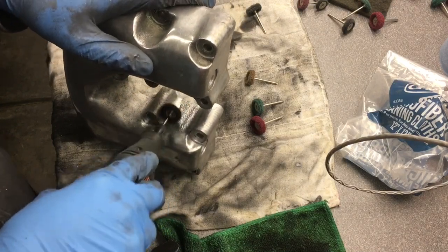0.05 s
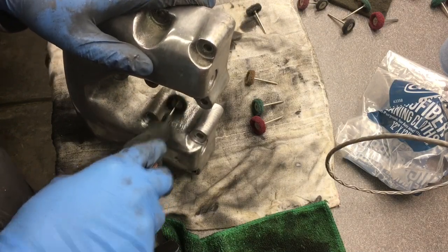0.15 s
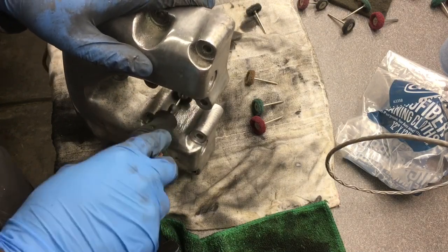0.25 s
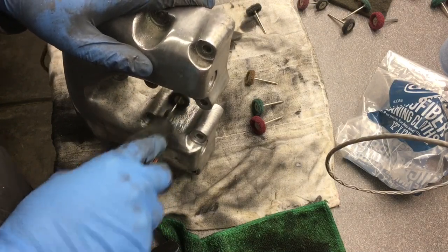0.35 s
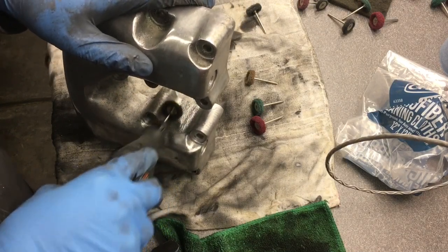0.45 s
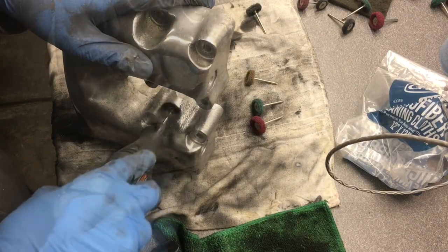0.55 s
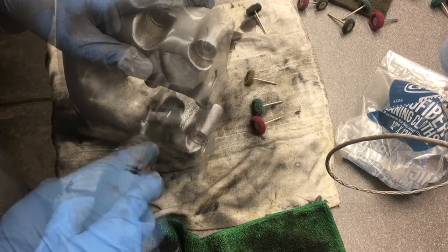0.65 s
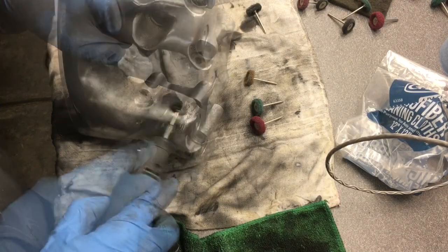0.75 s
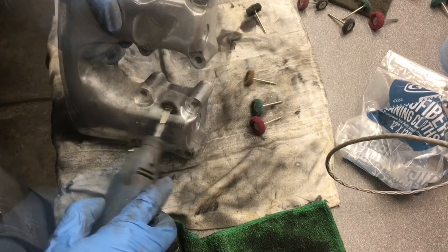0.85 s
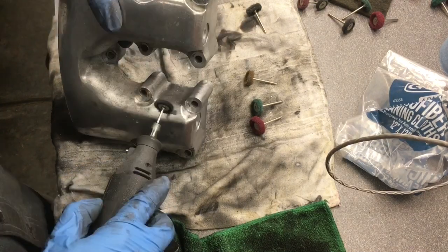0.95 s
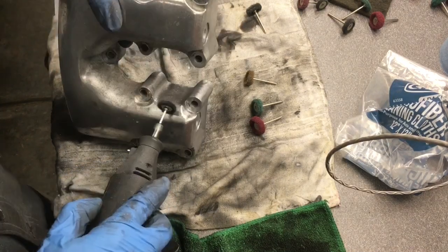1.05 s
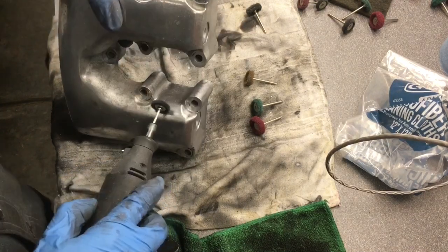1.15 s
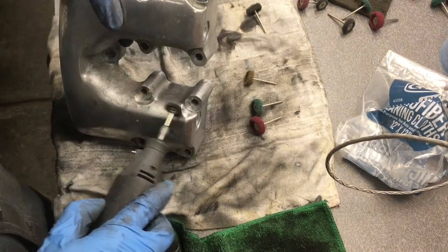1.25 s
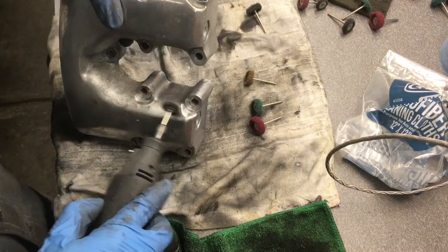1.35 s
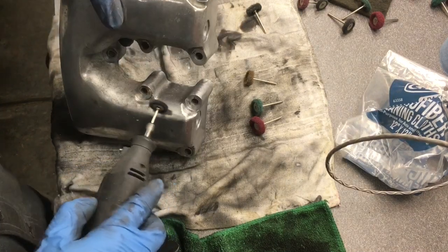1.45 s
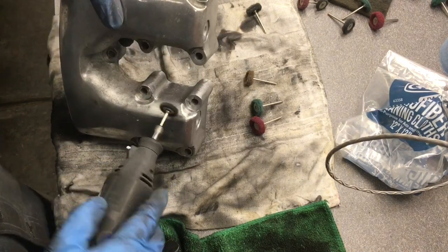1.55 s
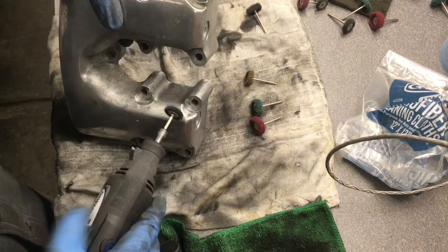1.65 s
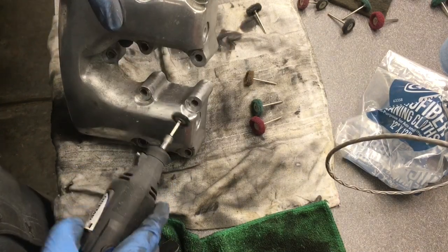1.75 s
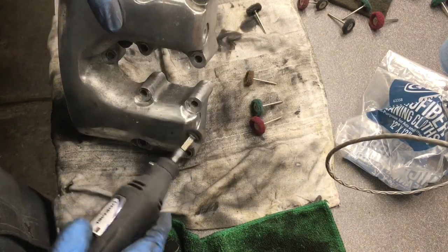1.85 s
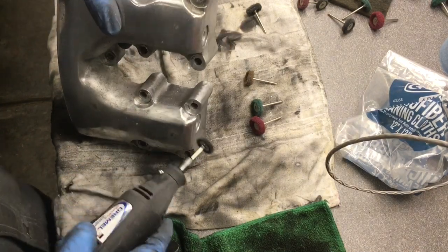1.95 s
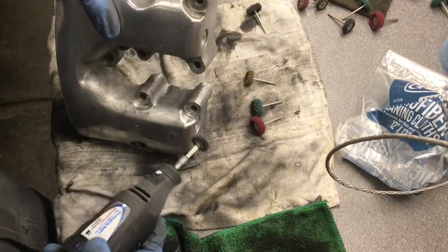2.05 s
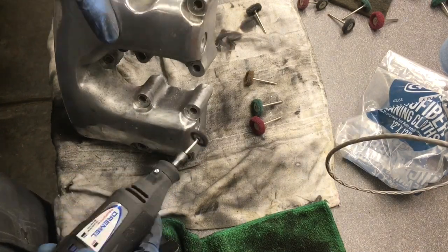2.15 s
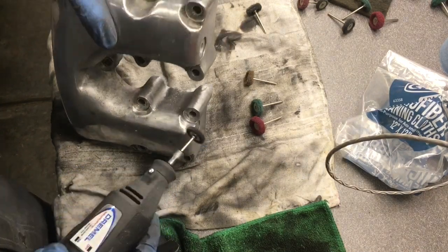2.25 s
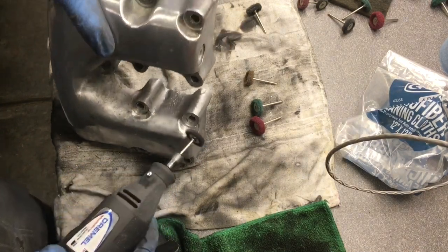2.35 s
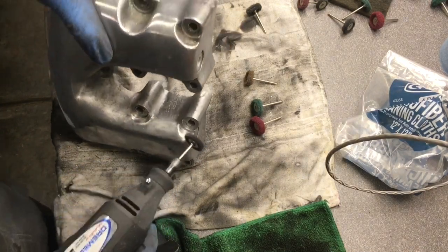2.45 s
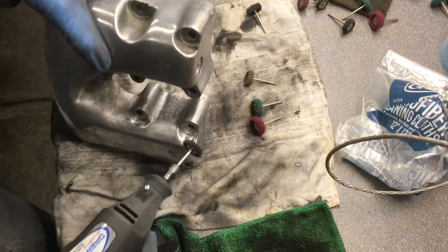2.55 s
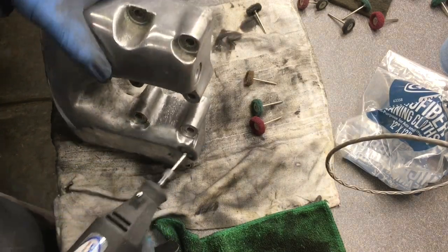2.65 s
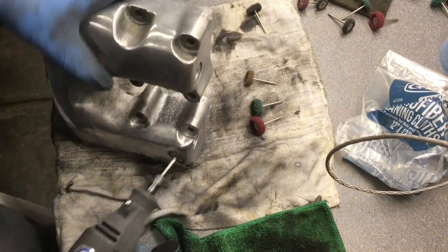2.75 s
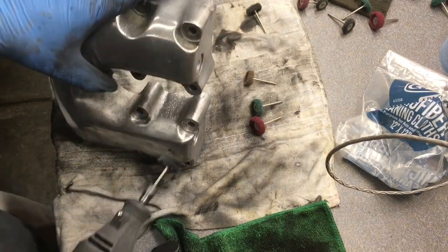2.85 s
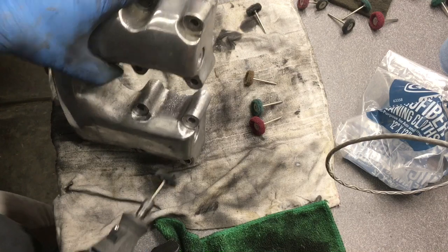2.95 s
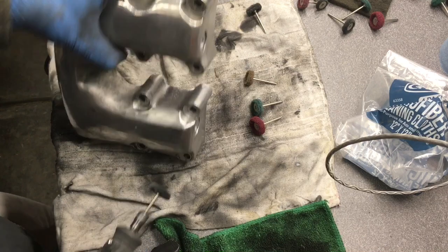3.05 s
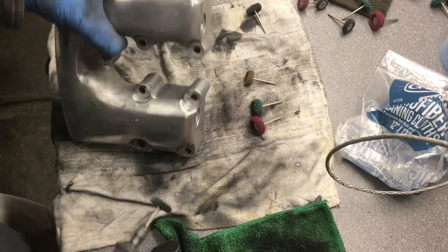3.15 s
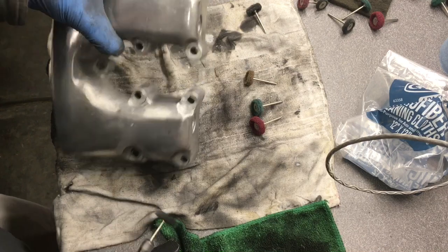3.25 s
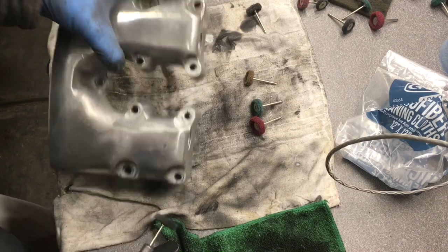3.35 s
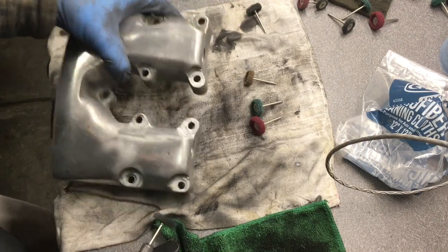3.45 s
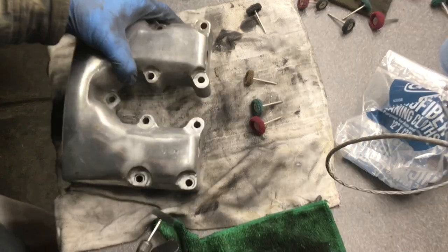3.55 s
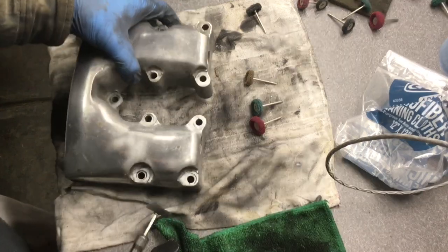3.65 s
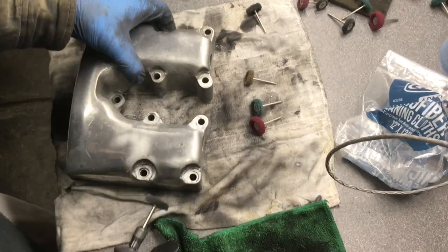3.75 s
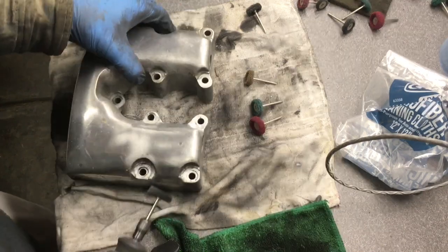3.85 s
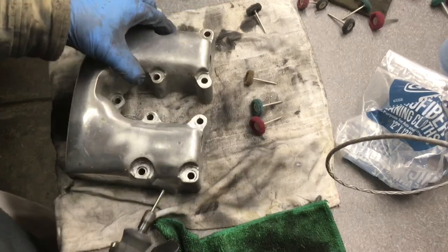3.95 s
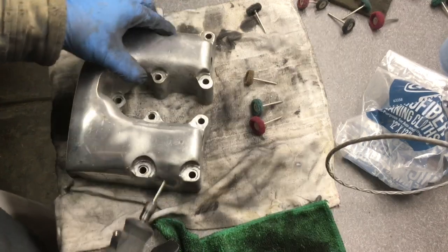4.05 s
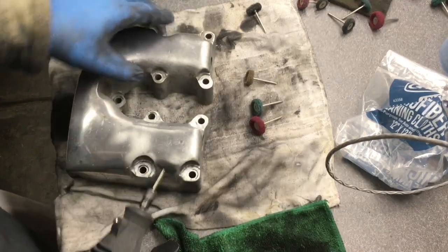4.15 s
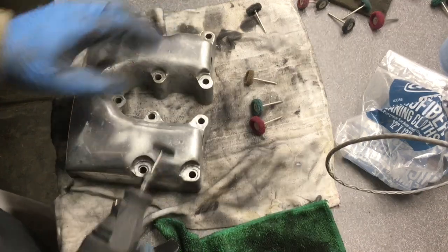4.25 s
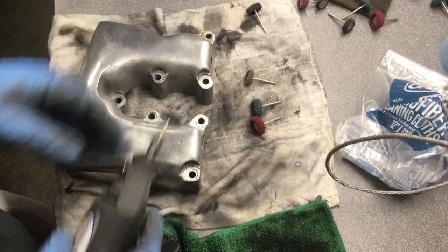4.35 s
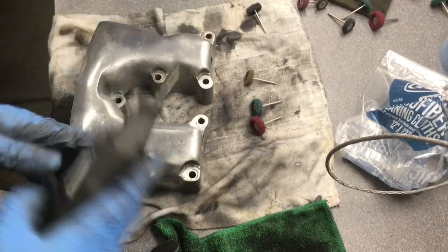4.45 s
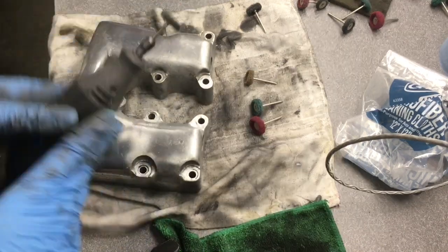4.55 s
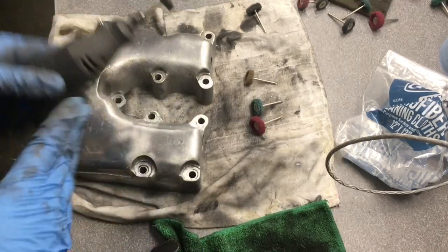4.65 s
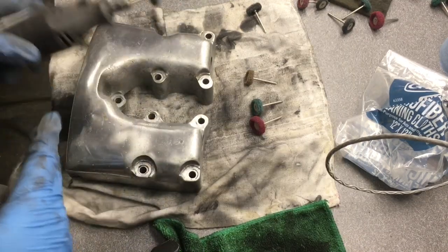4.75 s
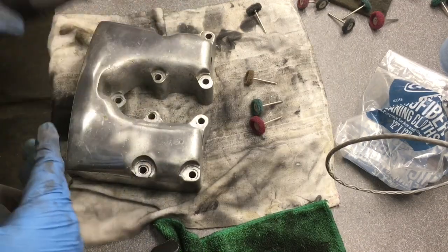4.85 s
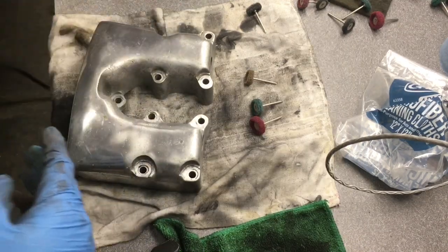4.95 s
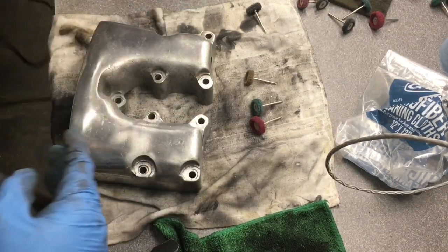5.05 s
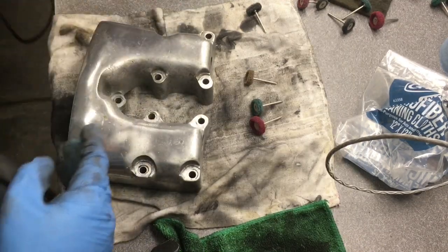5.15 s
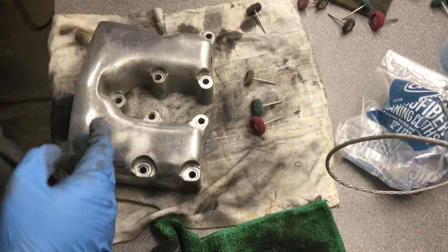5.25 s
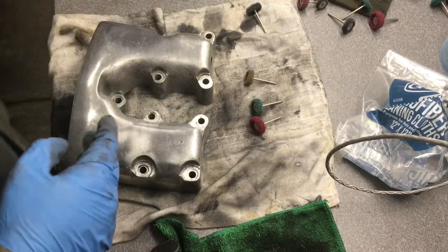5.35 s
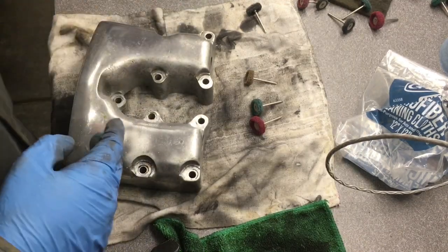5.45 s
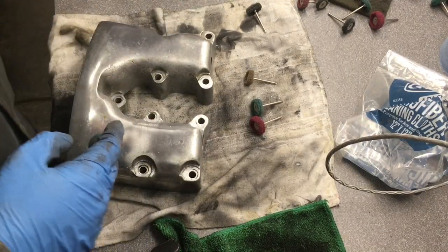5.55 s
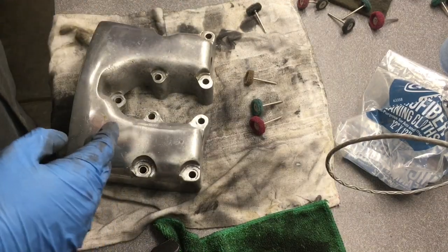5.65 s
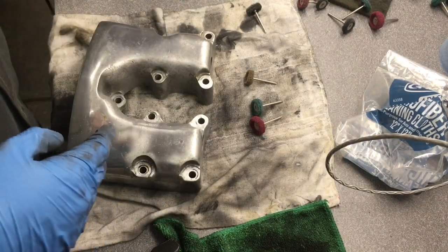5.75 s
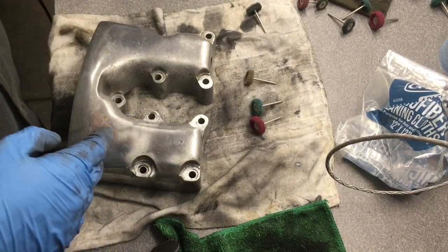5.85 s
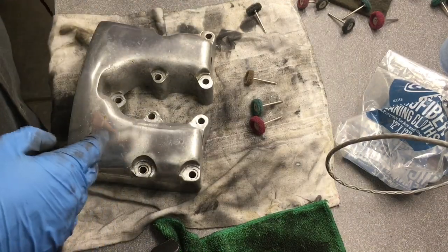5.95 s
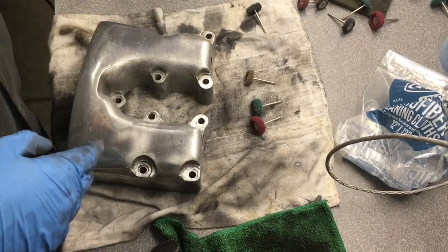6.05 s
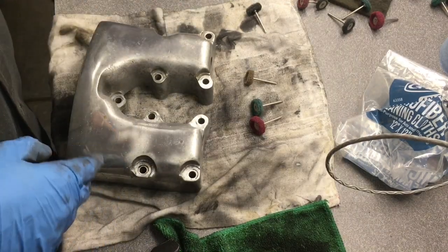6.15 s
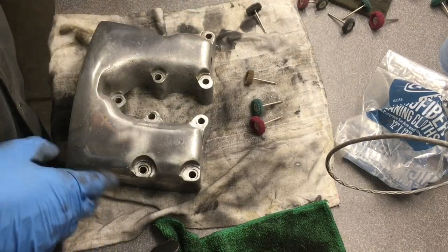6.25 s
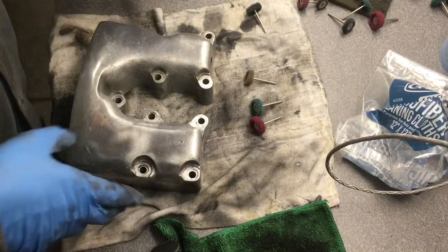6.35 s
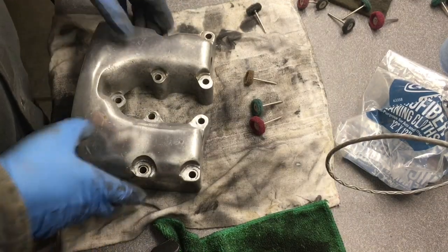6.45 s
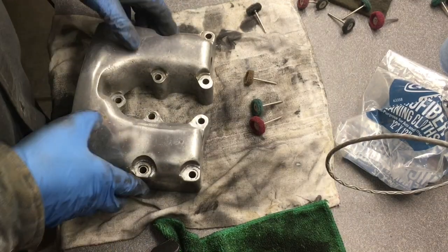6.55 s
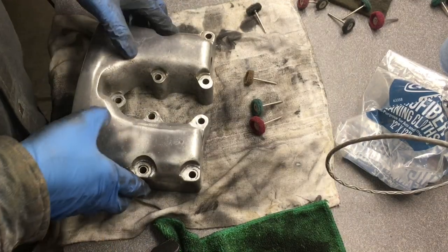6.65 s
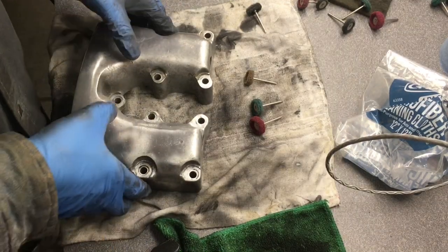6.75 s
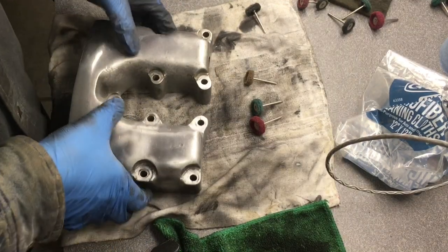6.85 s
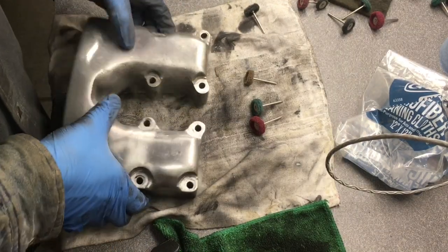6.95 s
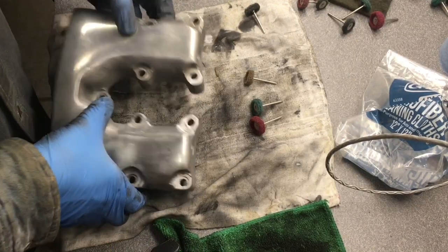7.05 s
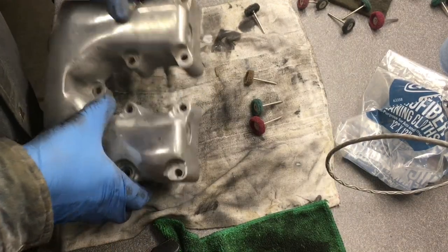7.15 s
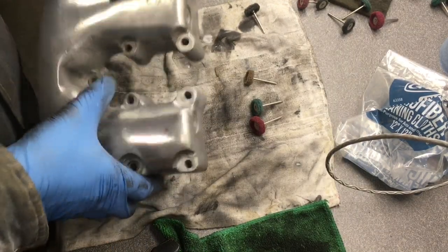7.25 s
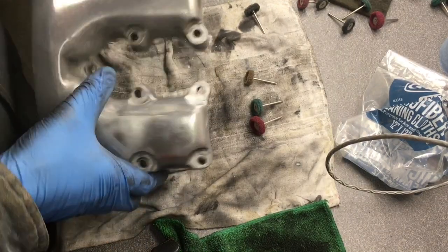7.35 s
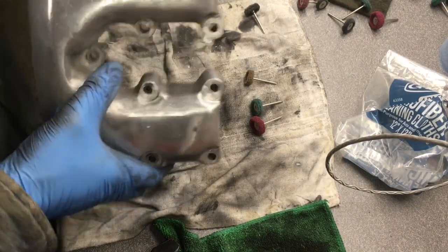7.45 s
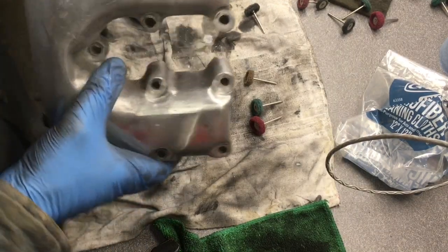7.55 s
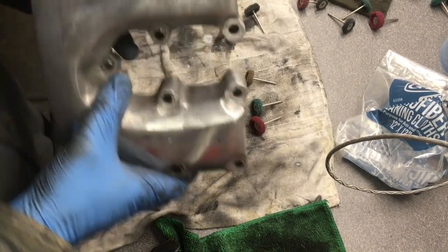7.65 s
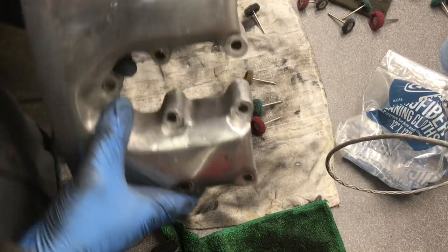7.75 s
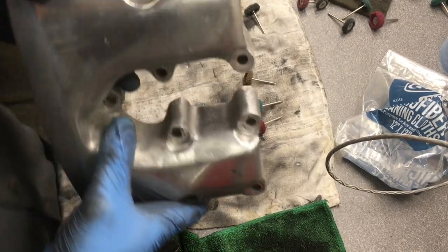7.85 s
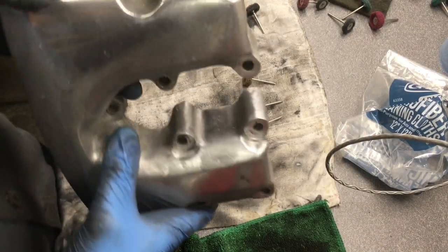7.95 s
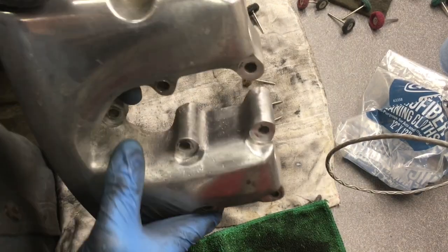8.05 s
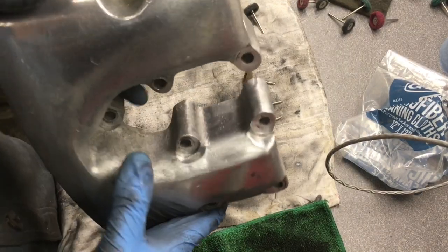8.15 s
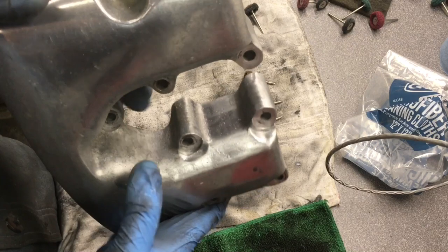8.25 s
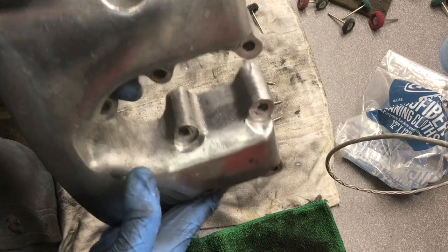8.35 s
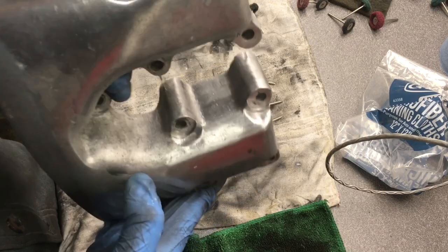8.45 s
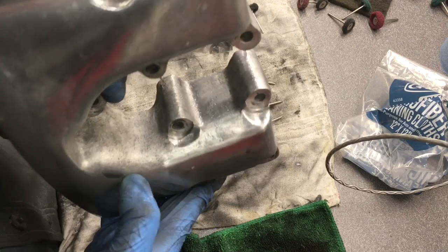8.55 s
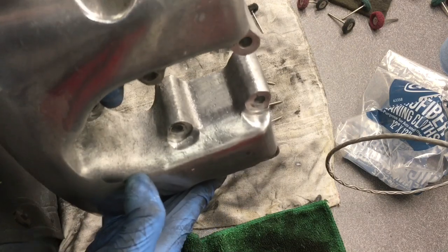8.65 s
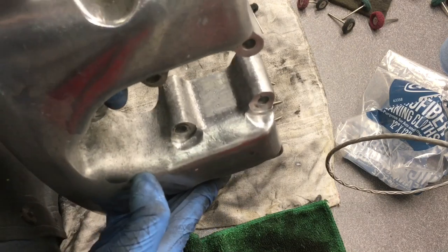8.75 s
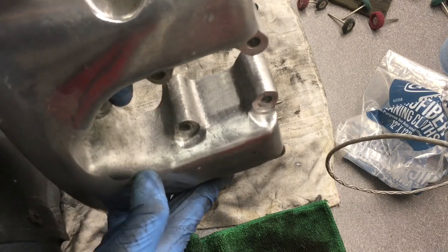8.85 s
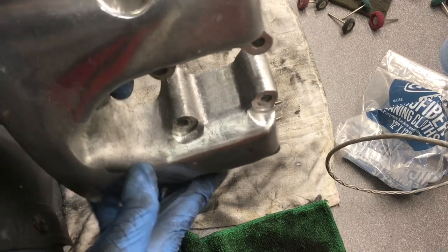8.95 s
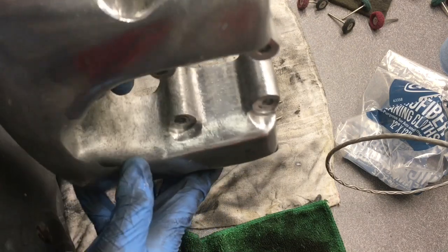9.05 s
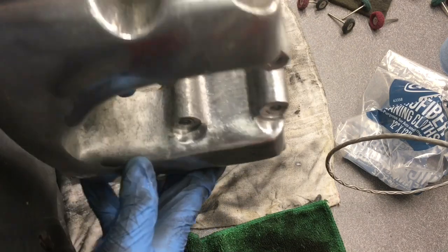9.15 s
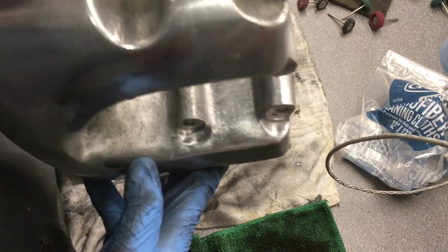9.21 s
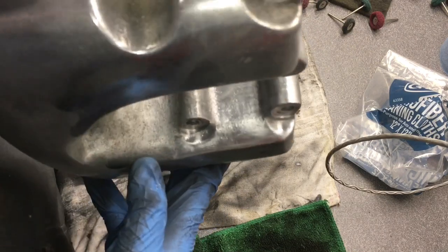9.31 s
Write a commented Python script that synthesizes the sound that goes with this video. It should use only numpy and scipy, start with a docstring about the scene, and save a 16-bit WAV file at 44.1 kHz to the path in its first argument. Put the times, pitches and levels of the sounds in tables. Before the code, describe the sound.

High-speed rotary tool hums, hisses and buzzes, coasts down in a falling whine, followed by a heavy knock, quiet ticks and soft hand rubbing.

```python
"""Rotary tool run-down, then bench handling

A small rotary tool spins a buffing wheel on a cast aluminium cover, speeds up, is switched off and coasts to rest:
tones locked to the shaft angle, plus air rush and brush hiss from shaped noise.
Thumps and ticks on a rag-covered bench ring modes; gloved hands wipe as gated noise; the lifted cover
scrapes and rings. A beating hum and rumble fill the garage. One close microphone."""
import sys
import numpy as np
from scipy import signal
from scipy.fft import rfft, irfft, next_fast_len
from scipy.io import wavfile

SR = 44100
rng = np.random.default_rng(int(sys.argv[2]) if len(sys.argv) > 2 else 0)


def dump(signal):
    """Clip the signal to [-1, 1] and save it as 16-bit WAV at the path in sys.argv[1]."""
    limited = np.clip(np.atleast_2d(signal).T, -1, 1)
    pcm = np.round(limited * 32767).astype(np.int16)
    wavfile.write(sys.argv[1], SR, pcm)


N = 413658
T = np.arange(N) / SR
CUTOFF_HZ = 15800

# Garage rumble: (frequency [Hz], density [dB per Hz])
RUMBLE_SPECTRUM = [(25, -39), (38, -22), (59, 1), (141, -22.5), (229, -23), (270, -26.5), (334, -17),
                   (450, -34.5), (900, -47)]
# Garage hum: (frequency [Hz], level [dB])
GARAGE_HUM = [(49.5, -51.5), (51.4, -56)]

# Rub on the rag: (frequency [Hz], gain [dB])
RAG_SPECTRUM = [(150, 5), (400, 3), (900, 0), (2200, -8.5), (3500, -18.5), (8000, -32)]
# Swish of the gloves: (frequency [Hz], gain [dB])
GLOVE_SPECTRUM = [(1200, -10), (3700, -2), (4900, -6.5), (6200, 0), (9000, -0.5), (10400, -1), (12000, 3),
                  (15700, 2)]
# Hand strokes: (time [s], length [s], rag rub [dB], glove swish [dB])
HAND_STROKES = [(4.44, 0.17, -56, -54.5), (4.608, 0.024, -52, -44.5), (4.72, 0.17, -56, -61.5),
                (5.013, 0.21, -51, -64), (5.187, .05, -58, -75), (5.267, 0.65, -65.5, -69),
                (5.561, 0.068, -47, -59), (6.506, 0.3, -70, -64), (6.8, 2.52, -74.5, -65),
                (7.024, 0.22, -72, -59), (7.442, 0.33, -80, -58.5), (7.583, 0.049, -67, -51.5),
                (7.946, 0.088, -69, -58.5), (8.132, 0.074, -73, -51.5), (8.244, .05, -76, -54.5),
                (8.39, 0.11, -67, -57.5), (8.92, 0.18, -71, -61)]
STROKE_ATTACK_S, STROKE_RELEASE_S = 0.021, 0.039
# Floor under the strokes
RAG_FLOOR_DB, GLOVE_FLOOR_DB = -72, -80

# Soft blows on the bench: (time [s], direct peak [dB], contact cut-off [Hz])
BENCH_BLOWS = [(3.6225, -6, 794), (3.6275, -3, 590), (3.6345, -30, 172), (3.989, -18.5, 121),
               (4.026, -26, 151.2), (4.058, -23, 258), (4.14, -28.5, 99), (5.583, -30, 1110),
               (5.809, -23.5, 176), (6.555, -41, 258.6), (9.358, -33.5, 600)]
# Bench modes: (frequency [Hz], level [dB], t60 [s])
BENCH_MODES = [(90, -12, 0.55), (120.5, 0, 0.15), (205, -17, 0.1), (250, -4, 0.042), (380, -12, 0.08),
               (465, -12, .06), (665, -7, 0.049), (1040, -15.5, 0.042)]
# Small sharp contacts: (time [s], ring level at the attack [dB], ring frequency [Hz])
SHARP_CONTACTS = [(4.464, -46, 1500), (5.502, -50.5, 4100), (5.548, -38.5, 1830), (5.626, -42, 1160),
                  (5.781, -56, 2500), (5.805, -48, 3470), (6.233, -58, 696), (8.7561, -29, 3470),
                  (8.848, -60, 3600), (9.3445, -30, 1550)]
# Cover modes: (frequency [Hz], level [dB], t60 [s])
COVER_MODES = [(960, -9, 5.5), (1260, -7, .9), (1450, -2, 1.6), (1570, -4, .9), (1980, -9, 1.0),
               (2120, -3, 1.4), (2509, -11, 0.9)]
# Rough part of the cover's scrape: (frequency [Hz], gain [dB])
SCRAPE_SPECTRUM = [(700, -6), (1450, -3), (1800, -6), (2150, -6), (3500, -15)]
# Pick-up of the cover
LIFT_S, LIFT_RING_DB = 6.881, -59
SCRAPE_DB, SCRAPE_T60_S = -58.5, 2.3

# Shaft speed under power: (time [s], speed [turns/s])
DRIVEN_SPEED = [(0, 437.8), (.22, 435.9), (.38, 432.2), (.52, 437.6), (.7, 455.3), (.92, 465.4), (.94, 475),
                (1.55, 487), (1.82, 512.4), (2.18, 531.1), (2.54, 538.5)]
# Braking by dry friction and by air drag, equal to the friction at the drag speed
OFF_S, FRICTION_TURNS_PER_S2, DRAG_SPEED_TURNS_PER_S = 2.549, 221, 715
# Wheel pressed on the metal: (time [s], length [s], pressure [dB])
WHEEL_PRESSES = [(0.25, 0.14, -11.5), (.96, 0.66, -6), (1.67, 0.54, -1.5), (2.092, 0.46, 4.5)]
PRESS_ATTACK_S, PRESS_RELEASE_S = 0.036, 0.035

# Unbalance on orders 1, 2, 3: (free level [dB], added level per unit pressure [dB])
UNBALANCE_ORDERS = [(4, -1.5), (-8, 6.5), (-1.5, -0.5)]
# Bearing buzz on orders from 4 upwards: (level [dB])
BEARING_ORDERS = [0.5, -0.5, -3, -1.5, 0.5, -1.5, -4, -6]
# Housing resonances: (centre [Hz], width [Hz], peak [dB])
HOUSING_RESONANCES = [(406.3, 30, 3), (527, 42, -2), (941, 18, 2.5), (1068, 32, 2.5), (1170, 90, 1.5),
                      (1325, 53, 3), (1438, 32, 3), (1537, 38, 4), (2236, 150, 0.5), (2597, 44, 4.5),
                      (3162, 90, 4), (3491, 110, 2), (4250, 46, -3)]
HOUSING_FLOOR_DB = -7
# Fan whine apart from its rise with speed: (time [s], level [dB])
FAN_WHINE_LEVEL = [(0, 5.5), (.18, 8), (.35, -4.5), (.48, 7.5), (.62, -3), (.9, -2), (.98, 4), (1.3, 3),
                   (1.75, -3.5), (2.52, -8.5), (2.64, 3.5), (2.79, 4), (2.9, 0.5), (3.38, 6.5), (3.6, -3)]
# Armature slots whining past the magnets, orders 16, 24, 32: (level at top speed [dB])
SLOT_WHINE_LEVELS = [-36, -33, -41]
# Casing response to the armature: (frequency [Hz], gain [dB])
CASING_RESPONSE = [(700, -25), (1200, -6), (1900, -28), (2350, -2), (2800, -10), (3500, 5.5), (4900, -6),
                   (6200, 3.5), (7500, -1), (11500, 6.5), (15000, -14.5)]
# Air rush: (frequency [Hz], gain [dB])
AIR_SPECTRUM = [(220, -30), (350, -15), (620, -12.5), (850, -8), (1150, -0.5), (1350, -1.5), (1650, -7),
                (2250, -3.5), (2800, -8), (4800, -15.5), (9000, -36)]
# Brush hiss: (frequency [Hz], gain [dB])
HISS_SPECTRUM = [(1000, -29), (2500, -10), (3400, -3.5), (4300, -8.5), (4900, -9), (6000, 0), (7500, 1.5),
                 (9300, 3.5), (10400, -3), (11600, 1.5), (15700, 2)]
# Brush scratches at low speed: (frequency [Hz], gain [dB])
SCRATCH_SPECTRUM = [(2000, -17.5), (3500, -4), (4900, -13), (6200, -3), (7500, -12), (10500, -4.5),
                    (12200, 2), (13500, 1), (15700, -15)]

# Base levels at top speed, and the power of speed each follows
AIR_DB, AIR_POWER = -31.5, 1.71
HISS_DB, HISS_POWER = -26.5, 1.152
UNBALANCE_DB, UNBALANCE_POWER = -29, 2.94
FAN_DB, FAN_POWER = -25.5, 3.14
SLOT_WHINE_POWER = 1.93
# Buzz at top speed, driven and coasting; buzz and hiss gained per unit pressure
FREE_BUZZ_DB, COAST_BUZZ_DB = -47.5, -37
PRESSED_BUZZ_DB, PRESSED_HISS_DB = -35.5, 1.0
# Speeds below which unbalance drops fast, slots whine and scratches emerge
UNBALANCE_KNEE_TURNS_PER_S, SLOT_WHINE_BELOW_TURNS_PER_S, SCRATCH_BELOW_TURNS_PER_S = 340, 307, 212
# Armature comb against the hiss, and its time to emerge after switch-off
DRIVEN_COMB_DB, COASTING_COMB_DB, EMERGE_S = -21, -13.5, 0.45
# Brief dip and flutter of the low tones
DIP_S, DIP_LENGTH_S, DIP_EDGE_S, DIP_DB, DIP_FLUTTER_DB = 0.53, 0.32, 0.06, -3.5, 3
# Second whistle beside the whine
WHISTLE_S, WHISTLE_LENGTH_S, WHISTLE_FADE_S, WHISTLE_HZ, WHISTLE_DB = 0.64, 0.22, 0.039, 8540, -30.5
# Close reflections from casting and bench
NEAR_DB, NEAR_T60_S = -7, 0.035


def from_db(db):
    """Decibels to gain."""
    return 10 ** (np.asarray(db) / 20)


def rms_one(x):
    """Scale to unit power."""
    return x / np.sqrt(np.mean(x ** 2) + 1e-20)


def in_time(table):
    """Join rows of (time [s], value) into a curve."""
    return np.interp(T, *np.transpose(table))


def gain_at(spectrum, hz):
    """Gain of a spectrum, interpolated in dB over log frequency."""
    points = np.array(spectrum)
    log_hz = np.log(np.maximum(hz, 1))
    return from_db(np.interp(log_hz, np.log(points[:, 0]), points[:, 1]))


def coloured(x, spectrum):
    """Shape a signal's spectrum between 20 Hz and the cut-off; unit power."""
    size = next_fast_len(N)
    hz = np.arange(size // 2 + 1) * SR / size
    gain = gain_at(spectrum, hz) * (hz > 20) * (hz < CUTOFF_HZ)
    return rms_one(irfft(rfft(x, size) * gain, size)[:N])


def drift(rate_hz):
    """Random wander of spread 1: two-pole low-passed noise at SR / 40."""
    pole = np.exp(-80 * np.pi * rate_hz / SR)
    noise = rng.standard_normal(N // 40 + 2002)
    slow = signal.lfilter([1], [1, -2 * pole, pole * pole], noise)[2000:]   # drop the settling
    return np.interp(np.arange(N) / 40, np.arange(len(slow)), rms_one(slow))


def angle(hz):
    """Phase [rad] of a frequency curve."""
    return 2 * np.pi * np.cumsum(hz) / SR


def tone(phase, db):
    """Sine of a given rms level."""
    return np.sqrt(2) * from_db(db) * np.sin(phase)


def swell(start_s, length_s, attack_s, release_s):
    """Linear rise, hold, exponential decay."""
    rise = np.clip((T - start_s) / attack_s, 0, 1)
    return rise * np.exp(-np.clip((T - start_s - length_s) / release_s, 0, 40))


def reflections(x, wet_db, t60_s):
    """Direct sound plus a short diffuse tail, which ripples the spectrum."""
    t = np.arange(SR // 2) / SR
    tail = rng.standard_normal(len(t)) * from_db(-60 * t / t60_s) * (t > .003)
    return x + from_db(wet_db) * signal.fftconvolve(x, tail / np.linalg.norm(tail))[:N]


def room_tone():
    """Two close low tones beat over a noise rumble."""
    hum = sum(tone(2 * np.pi * hz * T + .5 * drift(0.83), db + 0.68 * drift(2.5))
              for hz, db in GARAGE_HUM)
    return hum + from_db(-50.5) * coloured(rng.standard_normal(N), RUMBLE_SPECTRUM)


def hands():
    """Cloth rubs dully and rubber swishes brightly, both in small sticks and slips."""
    rag_power, glove_power = from_db(RAG_FLOOR_DB) ** 2, from_db(GLOVE_FLOOR_DB) ** 2
    for start_s, length_s, rag_db, glove_db in HAND_STROKES:
        stroke = swell(start_s, length_s, STROKE_ATTACK_S, STROKE_RELEASE_S)
        rag_power = rag_power + (from_db(rag_db) * stroke) ** 2
        glove_power = glove_power + (from_db(glove_db) * stroke) ** 2
    slips, grains = drift(45), drift(400)
    rag_noise = coloured(rng.standard_normal(N) * from_db(4 * grains), RAG_SPECTRUM)
    glove_noise = coloured(rng.standard_normal(N) * from_db(2.0 * grains), GLOVE_SPECTRUM)
    rag = np.sqrt(rag_power) * from_db(2.2 * slips) * rag_noise
    glove = np.sqrt(glove_power) * from_db(2.0 * slips) * glove_noise
    return reflections(rag + glove, NEAR_DB, NEAR_T60_S)


def strikes(blows, modes, scatter_db, crack_db, crack_t60_s):
    """Each blow rings all modes plus a short noise rattle; a softer contact dulls it."""
    out, t = np.zeros(N + SR), np.arange(SR // 2) / SR
    hz, mode_db, t60_s = np.array(modes).T[:, :, None]
    rings = from_db(mode_db - 60 * t / t60_s) * np.sin(2 * np.pi * hz * t)
    signs = (-1) ** np.arange(len(modes))
    # little radiates below the lowest mode
    highpass = signal.butter(2, hz.min(), "high", fs=SR, output="sos")
    for start_s, db, cut_hz in blows:
        body = from_db(rng.standard_normal(len(modes)) * scatter_db) * signs @ rings
        crack = from_db(crack_db - 60 * t / crack_t60_s) * rng.standard_normal(len(t))
        contact = signal.butter(2, min(cut_hz, CUTOFF_HZ), fs=SR, output="sos")
        hit = signal.sosfilt(contact, body + signal.sosfilt(highpass, crack))
        start = round(start_s * SR)
        out[start:start + len(t)] += from_db(db) * hit / np.abs(hit).max()
    return out[:N]


def clicks(ring_width, snap_db, burst_t60_s):
    """A contact is a short burst of micro-slips, ringing at the pitch of the spot touched."""
    out, t = np.zeros(N + SR), np.arange(SR // 10) / SR
    for start_s, db, hz in SHARP_CONTACTS:
        slips = rng.standard_normal(len(t))
        ring = rms_one(signal.lfilter(*signal.iirpeak(hz, 1 / ring_width, fs=SR), slips))
        band = signal.butter(2, [hz / 3, min(4 * hz, CUTOFF_HZ)], "band", fs=SR, output="sos")
        snap = rms_one(signal.sosfilt(band, slips))
        start = round(start_s * SR)
        burst = (ring + from_db(snap_db) * snap) * from_db(db - 60 * t / burst_t60_s)
        out[start:start + len(t)] += burst
    return out[:N]


def lifted_cover():
    """Decaying modes wander in phase and level over a rough noise scrape."""
    since_s = np.maximum(T - LIFT_S, 0)
    ring = sum(tone(2 * np.pi * hz * T + 1.3 * drift(31),
                    LIFT_RING_DB + db - 60 * since_s / t60_s + 2.5 * drift(16))
               for hz, db, t60_s in COVER_MODES)
    scrape_db = SCRAPE_DB - 60 * since_s / SCRAPE_T60_S + 2.7 * drift(60)
    scrape = from_db(scrape_db) * coloured(rng.standard_normal(N), SCRAPE_SPECTRUM)
    return (ring + scrape) * (since_s > 0)


def knocks():
    """Bench thumps and small ticks, each with a tail, and the lifted cover."""
    thumps = strikes(BENCH_BLOWS, BENCH_MODES, scatter_db=1.2, crack_db=-7, crack_t60_s=.17)
    ticks = clicks(ring_width=0.22, snap_db=-9.5, burst_t60_s=0.027)
    thumps = reflections(thumps, wet_db=-9.5, t60_s=0.33)
    return thumps + reflections(ticks, wet_db=-17, t60_s=0.11) + lifted_cover()


def shaft_speed():
    """Turns/s: driven until switch-off, then slowed by constant friction plus square-law drag."""
    top = DRIVEN_SPEED[-1][1]
    left = (np.arctan(top / DRAG_SPEED_TURNS_PER_S)
            - FRICTION_TURNS_PER_S2 / DRAG_SPEED_TURNS_PER_S * (T - OFF_S))
    coast = DRAG_SPEED_TURNS_PER_S * np.tan(np.maximum(left, 0))
    return np.where(T < OFF_S, in_time(DRIVEN_SPEED), coast)


def housing(hz):
    """Gain of the housing resonances, through which the motor tones slide."""
    grid_hz = np.geomspace(20, 8000, 1500)
    power = sum((from_db(db) / (1 + ((grid_hz - centre) / width) ** 2)) ** 2
                for centre, width, db in HOUSING_RESONANCES)
    return np.interp(hz, grid_hz, np.sqrt(power + from_db(HOUSING_FLOOR_DB) ** 2))


def unbalance(shaft, speed, speed_db, pressure):
    """Unbalance sings on the lowest orders through the housing."""
    hum = sum(housing(k * speed)
              * tone(k * shaft, UNBALANCE_DB + UNBALANCE_POWER * speed_db + db + pressed_db * pressure)
              for k, (db, pressed_db) in enumerate(UNBALANCE_ORDERS, 1))
    dip = swell(DIP_S, DIP_LENGTH_S, DIP_EDGE_S, DIP_EDGE_S)
    dip_db = dip * (DIP_DB + DIP_FLUTTER_DB * drift(40))
    slow_loss = np.minimum(speed / UNBALANCE_KNEE_TURNS_PER_S, 1) ** 3
    return hum * slow_loss * from_db(0.5 * drift(40) + dip_db)


def bearing_buzz(shaft, speed, speed_db, pressure):
    """The bearing buzzes on orders above the unbalance, more under pressure."""
    buzz = sum(housing(k * speed) * tone(k * shaft + rng.uniform(0, 2 * np.pi), db + 1.6 * drift(7))
               for k, db in enumerate(BEARING_ORDERS, len(UNBALANCE_ORDERS) + 1))
    free_db = np.where(T < OFF_S, FREE_BUZZ_DB, COAST_BUZZ_DB) + UNBALANCE_POWER * speed_db
    return (from_db(free_db) + from_db(PRESSED_BUZZ_DB) * pressure) * buzz


def fan_whine(shaft, speed_db):
    """The fan whines on order 18 with a wavering level."""
    whine_db = FAN_DB + FAN_POWER * speed_db + in_time(FAN_WHINE_LEVEL)
    return tone(18 * shaft, whine_db) * from_db(2 * drift(11))


def whistle():
    """A second whistle at a fixed, slightly wandering pitch swells and fades."""
    phase = 2 * np.pi * WHISTLE_HZ * T + 0.95 * drift(15)
    return tone(phase, WHISTLE_DB) * swell(WHISTLE_S, WHISTLE_LENGTH_S, WHISTLE_FADE_S, WHISTLE_FADE_S)


def slot_whine(shaft, speed, speed_db):
    """Clear whines fall with the shaft until too low for the casing to radiate."""
    slow = np.clip((SLOT_WHINE_BELOW_TURNS_PER_S - speed) / 60, 0, 1)
    return slow * sum(np.minimum(k * speed / 1100, 1) ** 6   # weak below 1100 Hz
                      * tone(k * shaft, db + SLOT_WHINE_POWER * speed_db + 3 * drift(8.8))
                      for k, db in zip((16, 24, 32), SLOT_WHINE_LEVELS))


def armature(shaft, speed, slot_db, waver_db, count=100):
    """High orders slide through the casing response, strongest near multiples of the eight slots."""
    turning, comb = speed > 0, np.zeros(N)
    for order in range(9, count):
        hz = order * speed[turning]
        near_slot = np.cos(2 * np.pi * order / 8) - 1
        level = from_db(slot_db * near_slot + waver_db * drift(6.3)[turning])
        gain = level * gain_at(CASING_RESPONSE, hz) * (hz < CUTOFF_HZ)
        taper = 1 - order / count   # the highest orders melt into the hiss
        phase = order * shaft[turning] + rng.uniform(0, 2 * np.pi)
        comb[turning] += taper * gain * np.sin(phase)
    return comb


def brush_scratches(shaft, speed, sharpness, scratch_db):
    """In the slow turns the brushes scratch once a turn: pulsed noise in the scratch spectrum."""
    pulse = rms_one((.5 + .5 * np.cos(shaft)) ** sharpness)
    below = SCRATCH_BELOW_TURNS_PER_S
    slow = np.clip((below - speed) / (below / 2), 0, 1) * (speed > 0)
    return from_db(scratch_db) * slow * coloured(rng.standard_normal(N) * pulse, SCRATCH_SPECTRUM)


def air_rush(speed_db):
    """Fan air: shaped noise growing with speed."""
    air_db = AIR_DB + AIR_POWER * speed_db + 1.2 * drift(16)
    return from_db(air_db) * coloured(rng.standard_normal(N), AIR_SPECTRUM)


def brush_noise(shaft, speed, speed_db, pressure):
    """Brush hiss pulses each turn; the armature comb emerges in the coast, scratches in the slow turns."""
    hiss = coloured(rng.standard_normal(N) * (1 + 0.24 * np.sin(shaft)), HISS_SPECTRUM)
    coasting = np.clip((T - OFF_S) / EMERGE_S, 0, 1)
    comb_db = DRIVEN_COMB_DB * (1 - coasting) + COASTING_COMB_DB * coasting
    comb = from_db(comb_db) * armature(shaft, speed, slot_db=2.5, waver_db=5.0)
    scratches = brush_scratches(shaft, speed, sharpness=0.57, scratch_db=2.0)
    level_db = HISS_DB + HISS_POWER * speed_db + PRESSED_HISS_DB * pressure + 0.56 * drift(20)
    return from_db(level_db) * (from_db(-3.0 * coasting - 1.73) * hiss + comb + scratches)


def tool():
    """One shaft angle drives all the turning parts; levels follow powers of speed."""
    speed = shaft_speed()
    speed_db = 20 * np.log10(speed / speed.max() + 1e-9)
    pressure = np.max([from_db(db) * swell(start_s, length_s, PRESS_ATTACK_S, PRESS_RELEASE_S)
                       for start_s, length_s, db in WHEEL_PRESSES], axis=0)
    shaft = angle(speed * (1 + 0.00027 * drift(30)))
    tones = unbalance(shaft, speed, speed_db, pressure) + bearing_buzz(shaft, speed, speed_db, pressure)
    tones = tones + fan_whine(shaft, speed_db) + whistle() + slot_whine(shaft, speed, speed_db)
    rush = air_rush(speed_db) + brush_noise(shaft, speed, speed_db, pressure)
    return tones + reflections(rush, NEAR_DB, NEAR_T60_S)


def scene():
    """Everything reaches one microphone, alike in both channels."""
    return np.tile(room_tone() + hands() + knocks() + tool(), (2, 1))


def record(dry):
    """Steep low-pass at the cut-off."""
    return signal.sosfilt(signal.ellip(12, .1, 80, CUTOFF_HZ, fs=SR, output="sos"), dry)


dry = scene()
out = record(dry)
dump(out)
```